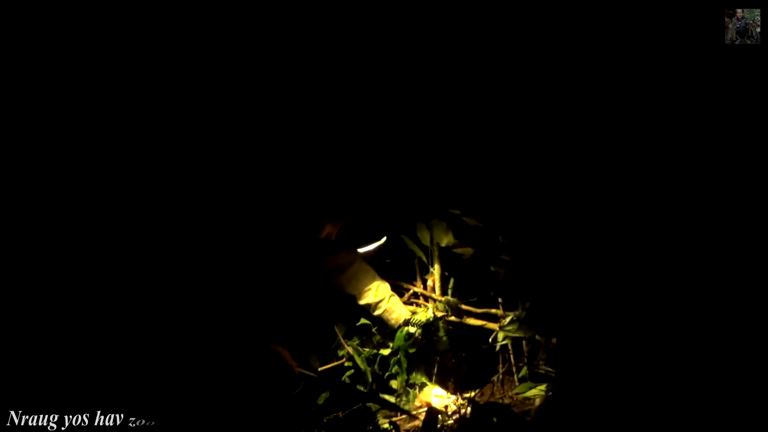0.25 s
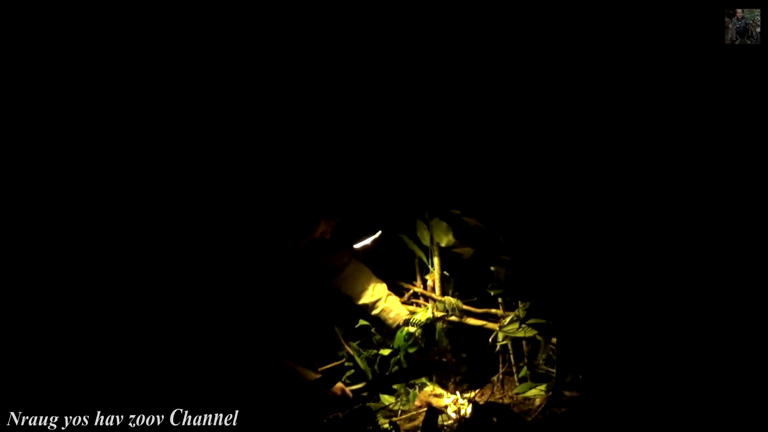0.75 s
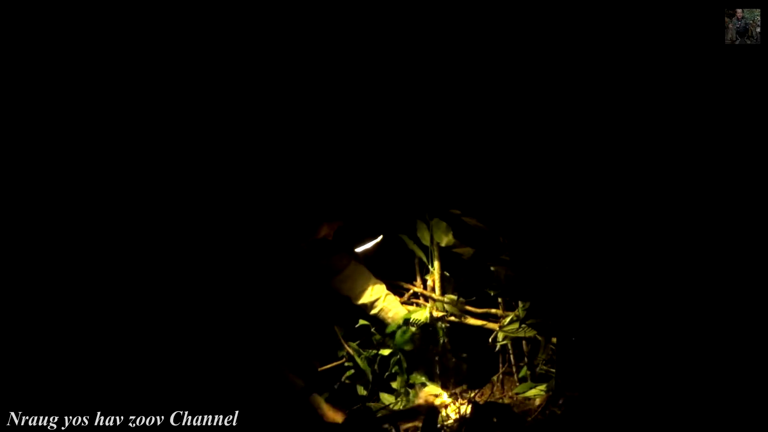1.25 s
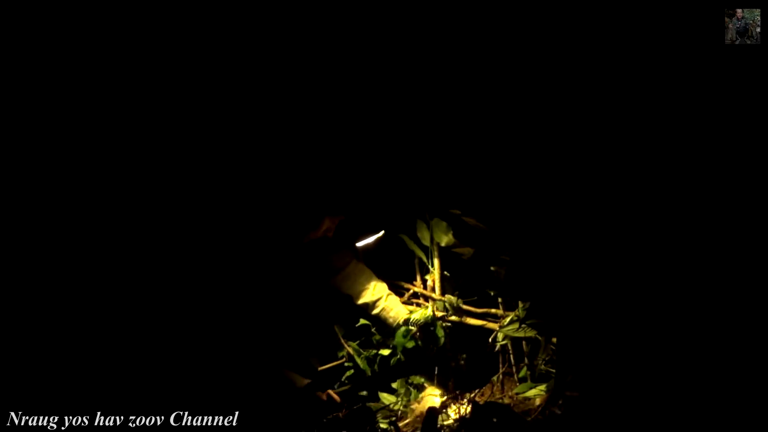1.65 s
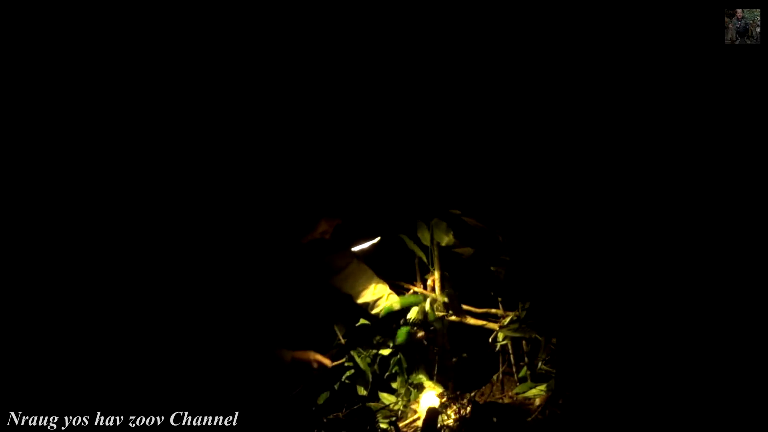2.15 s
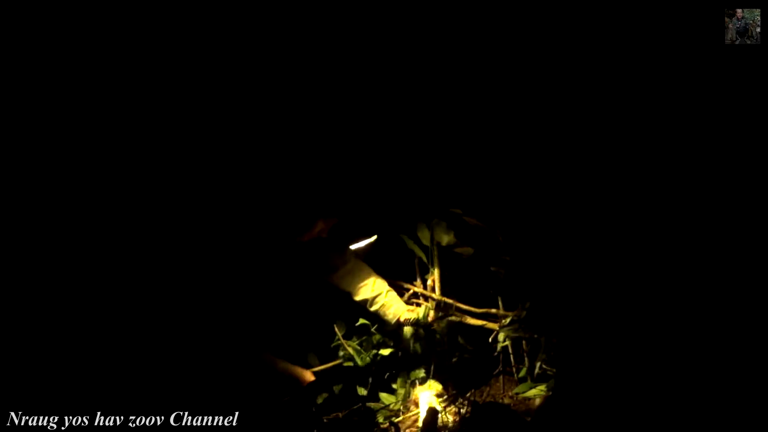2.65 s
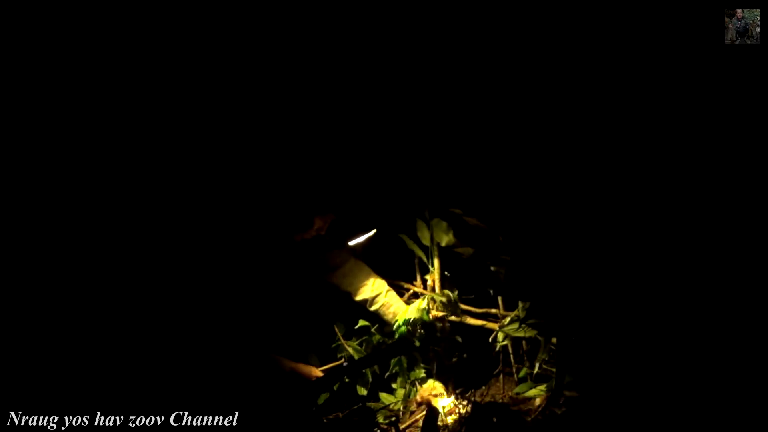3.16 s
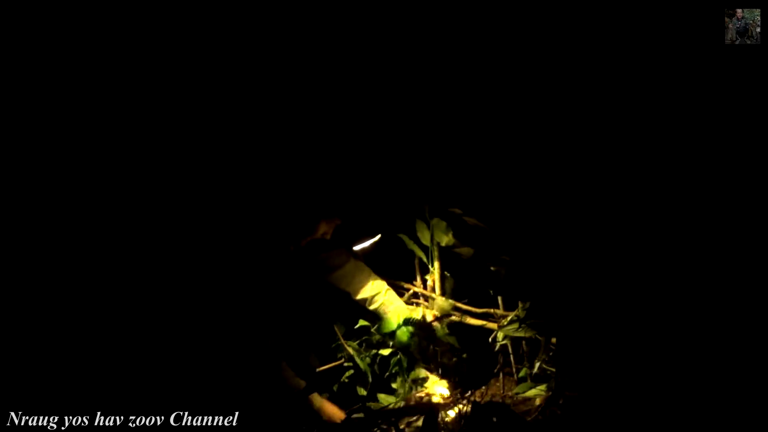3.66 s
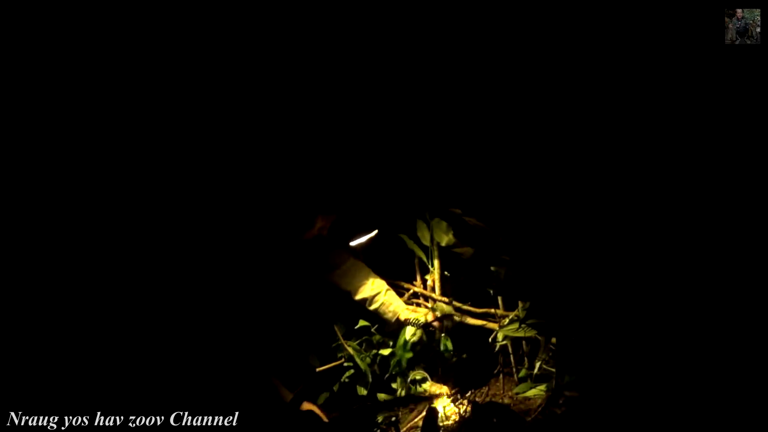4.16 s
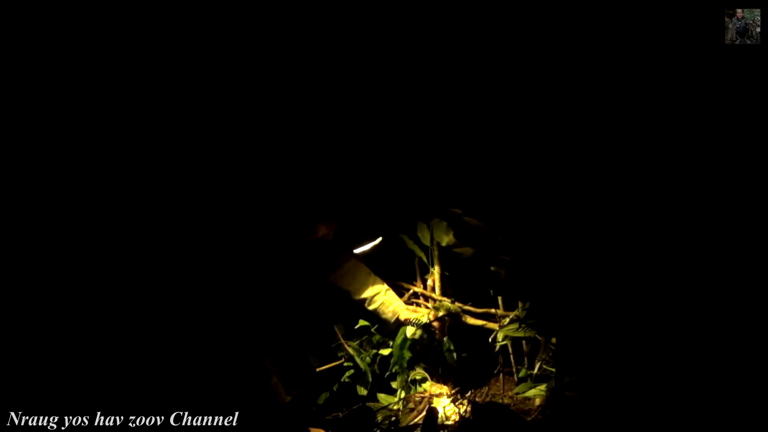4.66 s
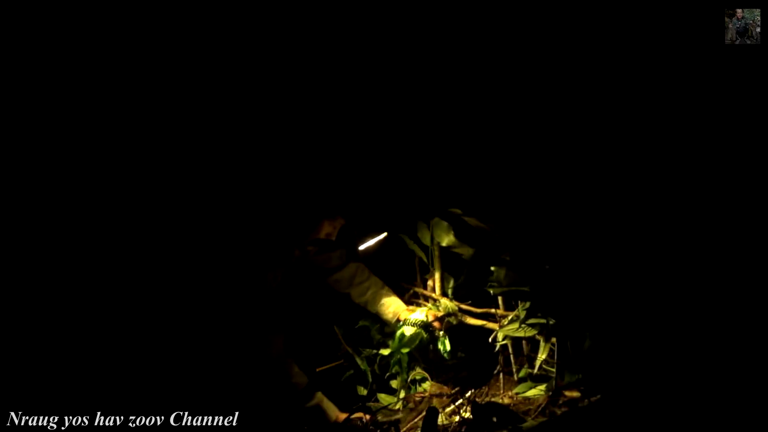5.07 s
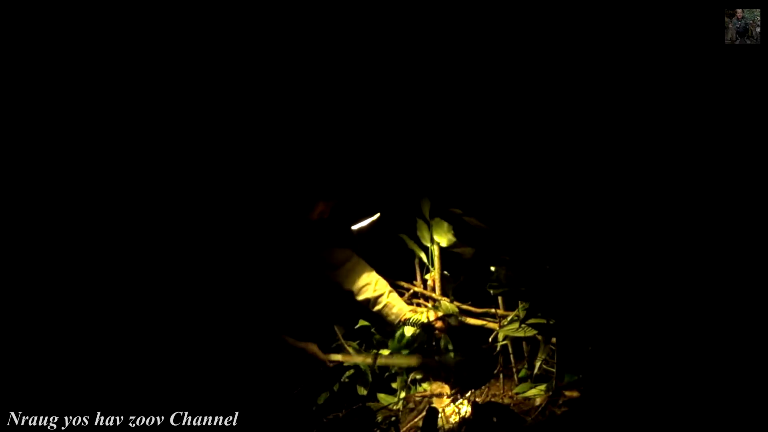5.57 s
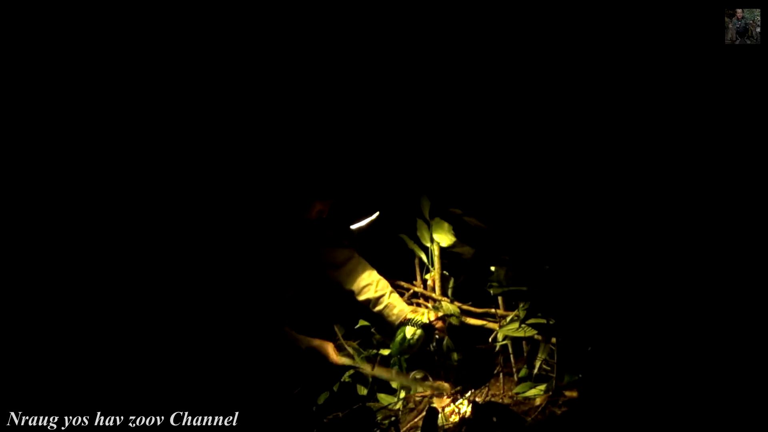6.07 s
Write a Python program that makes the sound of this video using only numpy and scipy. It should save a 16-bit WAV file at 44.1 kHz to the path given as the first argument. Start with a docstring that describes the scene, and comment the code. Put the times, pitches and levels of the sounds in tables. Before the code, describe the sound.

A steady, wide, soft hiss lies under everything from start to end, barely wavering, with its top treble cut off. It is alone until about 1.3 s, when a thin plant stem breaks close by: a small dull knock, a tiny squeak of splinter, a sharp dry crack and a brief crackle of tearing fibres. Around 2.5 s a second stem gives way with a stronger woody knock and a denser, crunchier tear. At about 3.66 s the third and loudest break comes, a hard, bright, wider snap that leaves a thin, very high ping fading over a fraction of a second. Near 4.3 s a small twig flicks with a faint, scratchy, squeaky tick. After that only the hiss continues to about 6.4 s. The breaks are central, short and light in bass, with a very brief scatter of echoes from nearby foliage.

```python
"""Night, dense undergrowth, a small camera close to the hands: a steady wide hiss lies under everything.
Three stems break in turn near 1.3, 2.5 and 3.7 s. Dull knocks are struck modes, tearing fibres are volleys
of clicks, sliding splinters are squeaks, and the core parts with a sharp fluttering note and a faint thud.
The last fibres follow; the third and loudest break leaves a thin high ping. At 4.3 s a small twig flicks.
Foliage close by scatters a very short tail from the breaks; the camera cuts the top of the treble."""
import sys
import numpy as np
from scipy import signal
from scipy.fft import rfft, irfft, next_fast_len
from scipy.io import wavfile

SR = 44100
rng = np.random.default_rng(int(sys.argv[2]) if len(sys.argv) > 2 else 0)


def to_wav(s):
    """Save 16-bit WAV."""
    ch = np.atleast_2d(s).T  # columns
    pcm = np.round(np.clip(ch, -1, 1) * 32767)  # PCM
    wavfile.write(sys.argv[1], SR, pcm.astype(np.int16))


N = 278712  # length [samples]


def gain_of(db):
    """Decibels to amplitude."""
    return 10 ** (np.asarray(db) / 20)


def evened(x):
    """Scales to rms 1."""
    return x / np.sqrt(np.mean(x ** 2) + 1e-20)


def read(points, hz):
    """Reads a table on a log-frequency axis."""
    f, value = np.transpose(points)
    return np.interp(np.log(hz + 1), np.log(f + 1), value)


def clock(size):
    """Sample times in seconds."""
    return np.arange(size) / SR


def dying(t, t60):
    """Falls 60 dB in t60 seconds."""
    return np.exp(-np.log(1000) * t / t60)


def swelling(t, rise):
    """Rises from 0 towards 1 with time constant rise, in seconds."""
    return 1 - np.exp(-t / rise)


def add(mix, s, sound):
    """Mixes a sound into both channels from time s."""
    part = mix[:, round(s * SR):][:, :sound.shape[-1]]
    part += sound[..., :part.shape[1]]


def played(table, source):
    """Lays out one sound per row: the time first, then the settings of the source."""
    mix = np.zeros((2, N))
    for s, *settings in table:
        add(mix, s, source(*settings))
    return mix


def without_bass(x, low_cut_hz):
    """Thin wood radiates little bass: a third-order high-pass."""
    return signal.sosfilt(signal.butter(3, low_cut_hz, "high", fs=SR, output="sos"), x)


def ring(modes):
    """Struck modes, each a dying sine."""
    t = clock(size=SR // 2)
    return sum(gain_of(db) * dying(t, t60) * np.sin(2 * np.pi * hz * t) for hz, db, t60 in modes)


def flutter(top_hz):
    """A quarter second of random wavering below top_hz, rms 1."""
    slow = signal.butter(3, top_hz, fs=SR, output="sos")
    return evened(signal.sosfilt(slow, rng.standard_normal(SR // 4)))


def rough_note(hz, rough=0.22, flutter_hz=700):
    """A note of wood that follows a pitch curve while its level flutters."""
    level = 1 + rough * flutter(flutter_hz)[-len(hz):]
    return level * np.sin(2 * np.pi * np.cumsum(hz) / SR)


# colour of the camera's hiss: (frequency [Hz], relative level [dB per Hz])
HISS_COLOUR = [(15, -52), (30, -33), (64, -28.5), (110, -17), (200, -11.5), (380, -11), (560, -6),
               (900, -2), (1900, 0), (4000, -1), (8800, -4.5), (10500, -10.5), (12500, -18.5), (15800, -28)]
# how alike its two channels are: (frequency [Hz], left-right likeness [0-1])
HISS_LIKENESS = [(30, 0.56), (120, 1), (290, 0.92), (640, 0.77), (1400, 0.72), (3100, 0.7), (7000, .76),
                 (11000, 1)]


def hiss(level_db=-38.5, waver_db=0.32):
    """Even, wide noise, mostly shared by both channels, with a barely wavering level."""
    size = next_fast_len(N)
    hz = np.fft.rfftfreq(size, 1 / SR)
    mid, side = rfft(rng.standard_normal((2, size))) * gain_of(read(HISS_COLOUR, hz))
    same = np.clip(read(HISS_LIKENESS, hz), 0, 1)
    side = side * np.sqrt((1 - same) / (1 + same))
    pair = irfft(np.array([mid + side, mid - side]), size)[:, :N]
    t = clock(size=N)
    waver_hz = np.geomspace(.5, 10, 20)
    waver = evened(sum(np.sin(2 * np.pi * (f * t + rng.random())) for f in waver_hz))
    return gain_of(level_db + waver_db * waver) * evened(pair)


def foliage(x, t60=0.065, wet_db=-19, echoes_per_s=3000, first_s=.003):
    """Leaves and stems close by throw back faint scattered echoes, different on each side."""
    t = clock(size=SR // 4)
    present = rng.random((2, len(t))) < echoes_per_s / SR
    taps = rng.standard_normal((2, len(t))) * present * dying(t, t60) * (t > first_s)
    taps = taps / np.linalg.norm(taps, axis=1, keepdims=True)
    return gain_of(wet_db) * signal.fftconvolve(x, taps, axes=1)[:, :N]


# a sharp strike, then a close pair that beats as in a small steel blade:
# (frequency [Hz], relative level [dB], t60 [s])
PING_MODES = [(9829, -16, .02), (9829, -26.5, .34), (9843, -35.5, .35)]


def ping(s=3.661, gain_db=0.8):
    """The thin high ring of struck modes after the loudest break, dry and centred."""
    mix = np.zeros((2, N))
    add(mix, s, gain_of(gain_db) * ring(PING_MODES))
    return mix


def thud(db, top_hz, t60=0.16, rise=0.0026):
    """A soft puff of low noise from the shaken plant."""
    t = clock(size=SR // 2)
    low_band = signal.butter(2, [top_hz / 2, top_hz], "band", fs=SR, output="sos")
    rumble = signal.sosfilt(low_band, rng.standard_normal(SR))[-len(t):]  # once the filter has settled
    return gain_of(db) * evened(rumble) * swelling(t, rise) * dying(t, t60)


# what a stem knocks with: (multiple of its note, relative level [dB], t60 when ringing freely [s])
STEM_MODES = [(.6, -18, .022), (.86, -16, .027), (1.04, -2.5, 0.022), (1.8, -6, 0.017), (2.4, -16, 0.011)]


def knock(db, note_hz, freedom, tilt_db, rise=0.00043, low_cut_hz=190):
    """A stem yields under the hand and rings dully; it is too thin to radiate bass."""
    modes = []
    for multiple, level, t60 in STEM_MODES:
        tilted_db = level + tilt_db * np.log2(multiple)
        modes.append((note_hz * multiple, tilted_db, t60 * freedom))
    body = ring(modes)
    body = body * swelling(clock(size=len(body)), rise)
    return gain_of(db) * without_bass(body, low_cut_hz)


# stems yield: (time [s], level [dB], stem note [Hz], share of its free ringing time,
# tilt of its modes [dB an octave])
KNOCKS_HEARD = [(1.3086, -22, 480, .9, 4.5), (2.4810, -16.5, 530, 1, -2.5), (2.4886, -22, 640, 0.82, 0),
                (3.6560, -24.5, 410, 0.54, -1)]


def knocks():
    """The dull knocks of the yielding stems."""
    return played(KNOCKS_HEARD, knock)


# what a splinter rings with: (multiple of its note, relative level [dB], wait [s])
SPLINTER_NOTES = [(.217, -15, 0), (.4, -13, .002), (1, -2.5, .004), (1.135, -14.5, .003),
                  (1.27, -21.5, 0.0012)]


def splinter(db, note_hz, length, sag):
    """A sliver of wood slides free with a bright squeak of notes that swell and stop, each after its wait."""
    t = clock(size=2048)
    squeak = np.zeros(len(t))
    for multiple, level, wait in SPLINTER_NOTES:
        slide = np.clip((t - wait) / length, 0, 1)
        swell = np.sin(np.pi * slide) ** 2
        pitch = note_hz * multiple * (1 - sag * (slide - .5))
        squeak += gain_of(db + level) * swell * rough_note(pitch)
    return squeak


# slivers slide free from stems and twig: (time [s], level [dB], note [Hz], length [s],
# fall of pitch [share of the note])
SPLINTERS_HEARD = [(1.3125, -25, 8900, 0.0078, 0.097), (2.4805, -18.5, 9100, 0.015, 0.019),
                   (3.6555, -19, 9100, 0.009, 0.052), (4.3060, -22.5, 9000, 0.0094, 0.017),
                   (4.3150, -31, 9070, 0.0047, 0.019)]


def splinters():
    """The squeaks of the slivers."""
    return played(SPLINTERS_HEARD, splinter)


# colour of one parting fibre: (frequency [Hz], relative level [dB per Hz])
FIBRE_COLOUR = [(40, -56), (120, -32), (230, -1), (400, 2.5), (1100, 2), (2000, -0.5), (3500, -1.5),
                (5500, -2), (7500, -1.5), (9200, -0.5), (11000, -5.5), (13000, -17.5), (16000, -22)]


def fibre_click(size, tilt_db, wood_hz, wood_db, wood_octaves=0.15):
    """One fibre parts: a causal click with a sharp front and a short tail, lifted at the wood's resonance."""
    hz = abs(np.fft.fftfreq(size, 1 / SR))
    octaves_away = np.log2((hz + 1) / wood_hz)
    wood = wood_db * np.exp(-.5 * (octaves_away / wood_octaves) ** 2)
    tilt = tilt_db * np.log2(hz / 4000 + 0.017)
    log_colour = np.log(gain_of(read(FIBRE_COLOUR, hz) + wood + tilt))
    minimum_phase = np.exp(np.conj(signal.hilbert(log_colour)))
    return np.fft.ifft(minimum_phase).real


def tear(db, hold, t60, tilt_db, wood_hz, wood_db, width, fibres_per_s=16000, spread_db=2.5, rise=0.000095):
    """Fibres part in a dense volley of clicks that holds briefly and dies away."""
    t = clock(size=4096)
    click = fibre_click(len(t), tilt_db, wood_hz, wood_db)
    shape = (2, len(t))
    sizes = gain_of(spread_db * rng.standard_normal(shape)) * rng.choice([-1, 1], shape)
    strain = swelling(t, rise) * dying(np.maximum(t - hold, 0), t60)
    volleys = sizes * (rng.random(shape) < fibres_per_s / SR) * strain
    mid, side = (evened(signal.fftconvolve(volley, click)[:len(t)]) for volley in volleys)
    pair = np.array([mid + width * side, mid - width * side])
    return gain_of(db) * pair * np.sqrt(np.mean(strain ** 2))


# volleys of fibres, from bark to last fibres in each stem, then the scraping twig:
# (time [s], level [dB], hold [s], t60 [s], treble tilt [dB an octave],
# wood resonance [Hz], its lift [dB], stereo width [0-1])
TEARS_HEARD = [(1.3084, -34, .002, 0.018, 1, 10000, 3, .13),
               (1.3155, -31.5, 0.0071, 0.013, -.3, 1500, 0, 0),
               (1.3243, -32.5, .003, 0.055, 1.5, 4400, 2, 0), (2.4810, -30, 0.003, 0.013, 1.5, 1110, 5, 0),
               (2.4861, -23, 0.0053, 0.015, -0.1, 3400, 9, 0.06),
               (2.4883, -31, 0.00084, 0.011, -3, 950, 6, 0),
               (2.4920, -21, 0.0033, 0.02, 3.5, 7250, 5, 0.05),
               (2.4980, -28.5, .004, 0.076, 0.5, 10200, 5.5, 0),
               (3.6543, -28, .0008, 0.016, 0, 4420, -3, 0), (3.6583, -25, 0.0023, 0.013, 1.7, 8000, 1, 0.6),
               (3.6602, -18.5, .0015, .008, 4.5, 5210, 7, 0.95),
               (3.6620, -21, 0.0026, .022, 1.9, 10400, 1, 0), (4.3085, -37, 0.008, .035, 6, 3650, 14, 0)]


def tears():
    """The tearing fibres of the three stems and the twig."""
    return played(TEARS_HEARD, tear)


def crack(db, note_hz, t60, hollow_db, hollow_hz, low_cut_hz=600):
    """The woody core parts at once: a broad, sharp click, then the note of the hollow stem swells."""
    t = clock(size=4096)
    scatter = 0.15  # rms share by which the note of the parting core jumps about
    click = rough_note(note_hz * (1 + scatter * flutter(1500)[:len(t)]))
    core = gain_of(db) * swelling(t, rise=0.00017) * dying(t, t60) * click
    hollow = gain_of(hollow_db) * swelling(t, rise=0.0011) * dying(t, t60=0.024)
    hollow = hollow * rough_note(np.full(len(t), hollow_hz))
    return without_bass(core + hollow, low_cut_hz)


# cores crack through: (time [s], click level [dB], click note [Hz], click t60 [s],
# hollow level [dB], hollow note [Hz], thud level [dB], thud top [Hz])
CRACKS_HEARD = [(1.3211, -12.5, 4030, 0.0033, -38, 1900, -82, 110),
                (2.4890, -18, 3350, .006, -26.5, 1900, -54, 125),
                (3.6607, -8, 2830, 0.0037, -23, 1945, -70, 80)]


def cracks():
    """Each core cracks through and shakes the plant."""
    mix = np.zeros((2, N))
    for s, *settings, thud_db, thud_hz in CRACKS_HEARD:
        add(mix, s, crack(*settings))
        add(mix, s, thud(thud_db, thud_hz))
    return mix


def scene():
    """The hiss, the breaking stems and the twig with their echoes, and the ping."""
    near = knocks() + splinters() + tears() + cracks()
    return hiss() + foliage(near) + ping() + near


def record(dry):
    """The camera's steep upper band limit."""
    edge_hz = 15900
    lowpass = signal.firwin(401, edge_hz, window=("kaiser", 9), fs=SR)
    return signal.oaconvolve(dry, lowpass[None], "same", axes=1)


dry = scene()
out = record(dry)
to_wav(out)
```